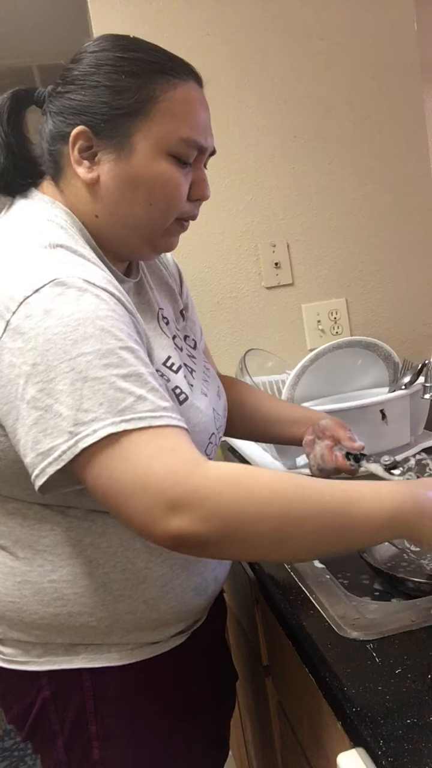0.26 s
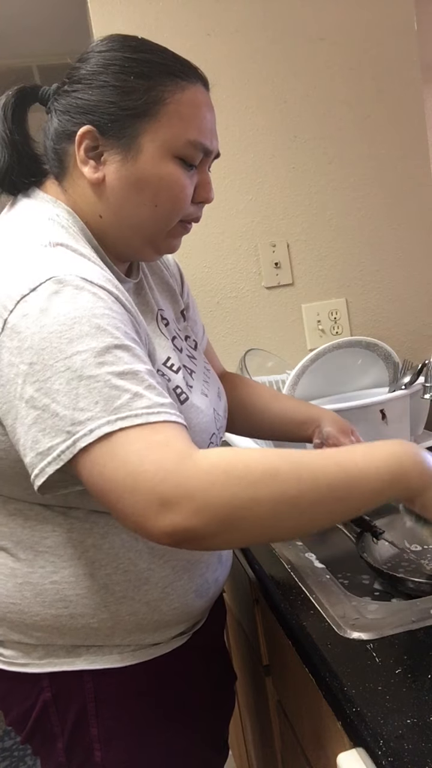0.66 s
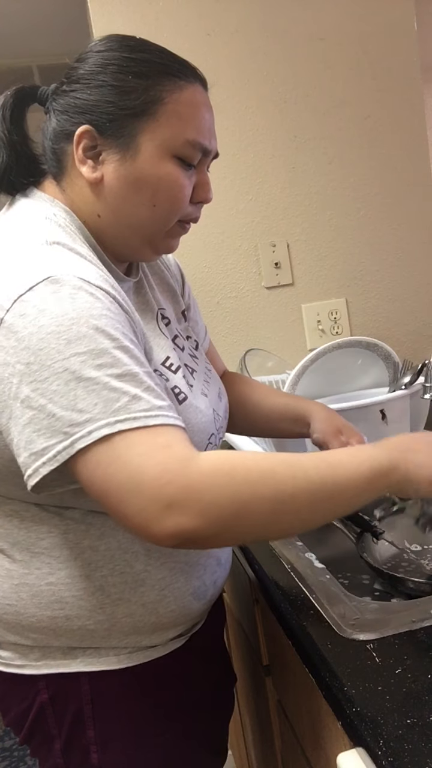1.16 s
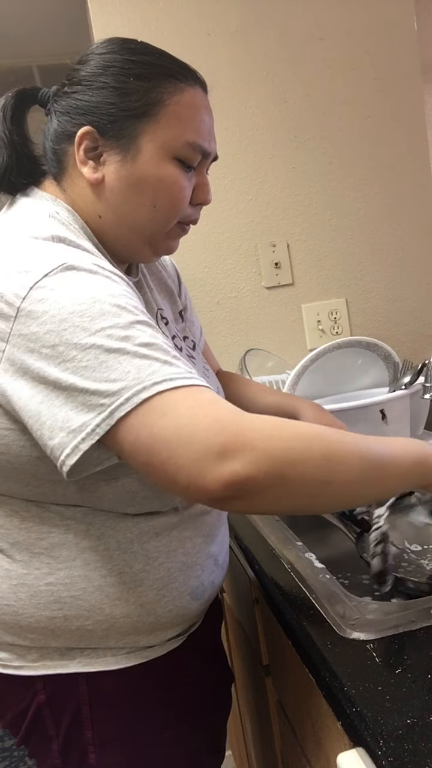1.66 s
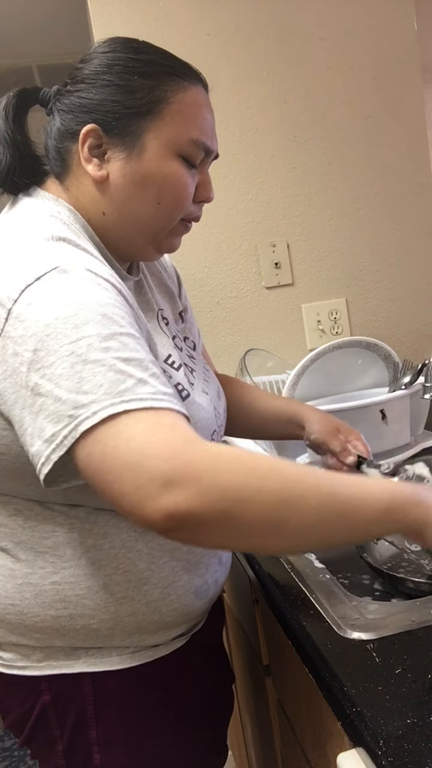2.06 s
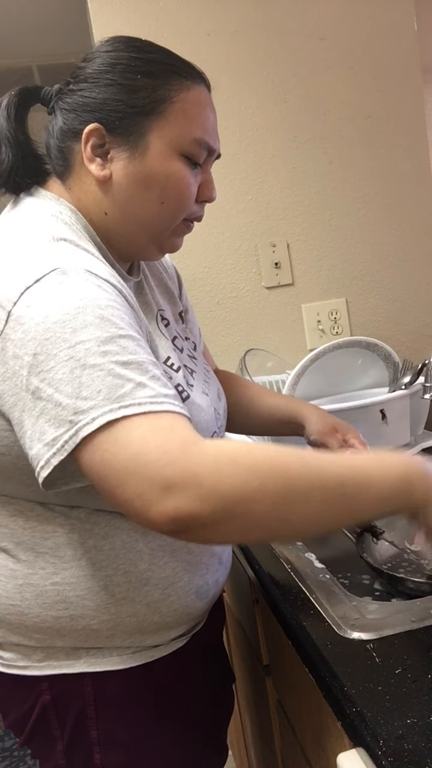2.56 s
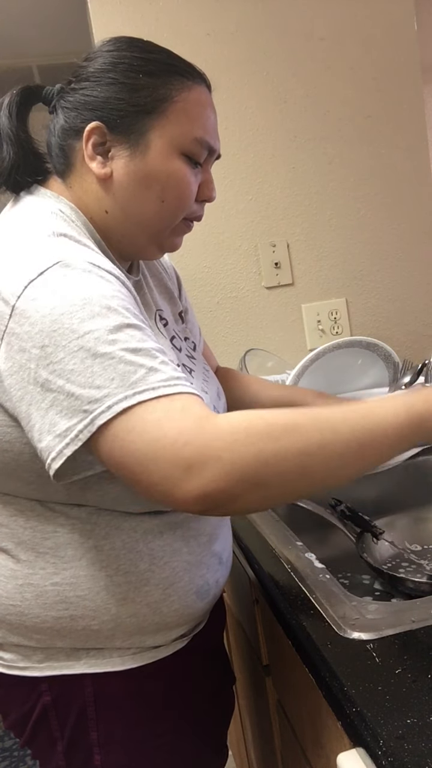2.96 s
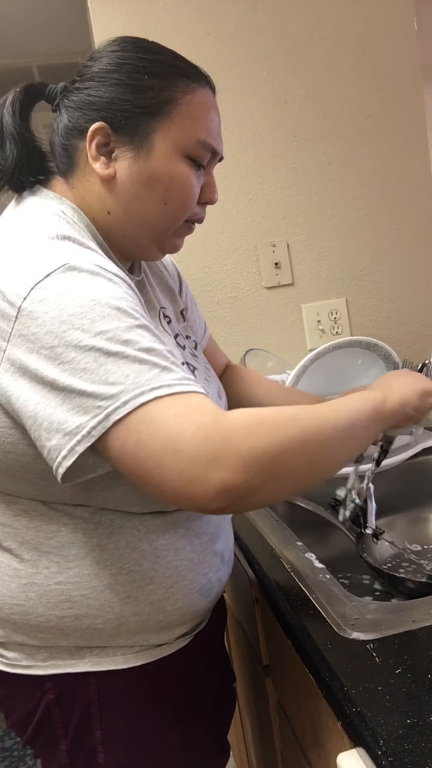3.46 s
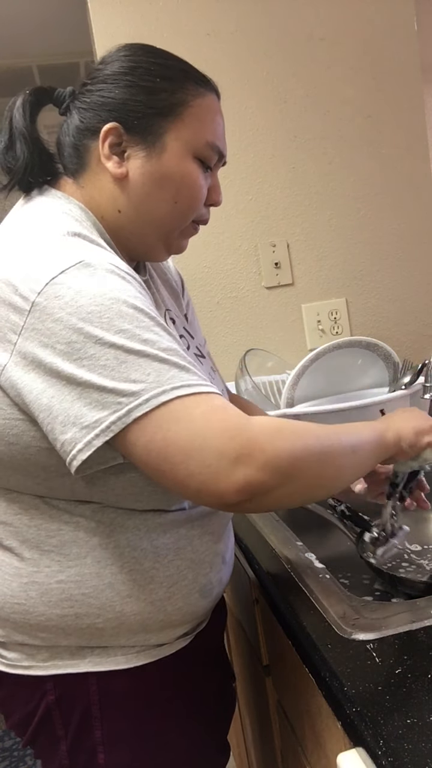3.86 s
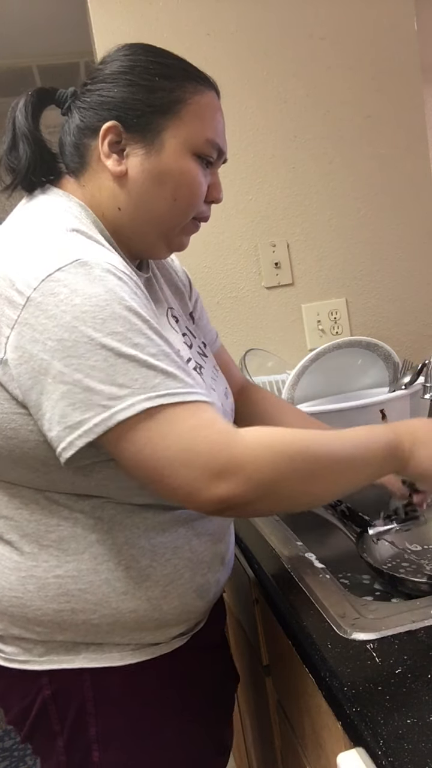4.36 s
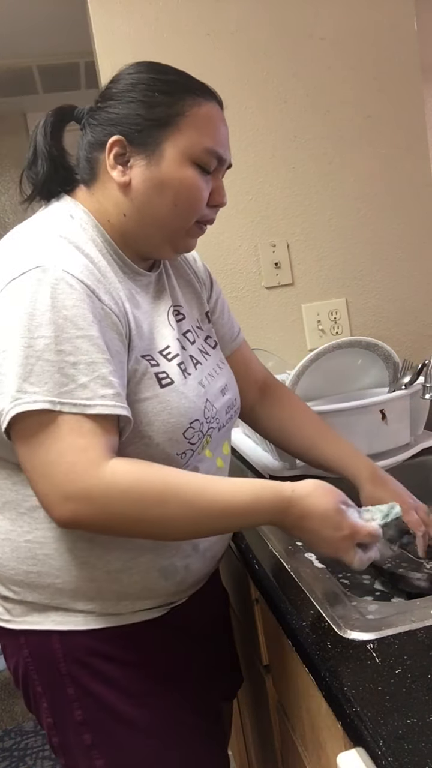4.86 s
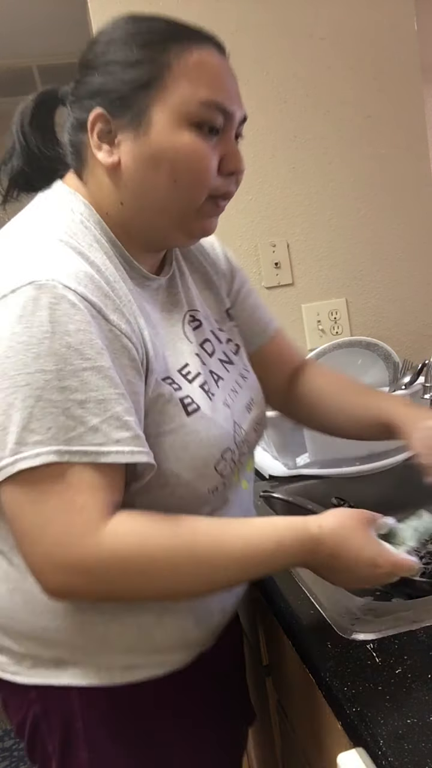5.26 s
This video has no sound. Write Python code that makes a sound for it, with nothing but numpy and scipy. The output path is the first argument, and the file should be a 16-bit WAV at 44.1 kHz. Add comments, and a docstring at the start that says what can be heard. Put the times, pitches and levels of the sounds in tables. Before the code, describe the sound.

Utensils are washed by hand at a steel sink, heard close in a small, slightly echoing kitchen with a faint, steady appliance hum. From the start until about 4.8 seconds everything is quiet: soft, wet sponge rubs swell and fade among small, irregular metal ticks and dull taps. The scrubbing is a little stronger around 1.4 to 1.7 seconds and again near 4.4. Soft, low bumps against the basin come at about 1.7 and 2.1 seconds, and a very faint squeak of wet steel at 2.7. At about 4.8 seconds the utensils land on a dish with a loud, bright clatter, followed by a second just after 5.0. Each has a short ring, a metallic rattle and a low boom from the basin. Lighter knocks fall between them and afterwards, at about 5.3 and 5.5 seconds.

```python
"""Washing up at a steel sink

Utensils are scrubbed by hand: friction makes soft wet rubs, and light impacts make small ticks.
They are then put down on a dish in the basin, which clatters loudly twice, with lighter knocks
between and after. Each knock excites the damped modes of the dish and the low boom of the basin.
The small kitchen reverberates, an appliance hums, and a limiter flattens the hardest blows."""
import sys
import numpy as np
from scipy import signal
from scipy.fft import rfft, irfft
from scipy.io import wavfile
from scipy.ndimage import uniform_filter1d, minimum_filter1d

SR = 44100
rng = np.random.default_rng(int(sys.argv[2]) if len(sys.argv) > 2 else 0)


def digitize_waveform(pressure):
    """Quantize a signal to 16-bit integers and store it at the path in sys.argv[1].

    Rows of a 2-D input are taken as channels; values are limited to [-1, 1].
    """
    field = np.atleast_2d(pressure).T
    bounded = np.clip(field, -1, 1)
    quanta = np.round(bounded * 32767).astype(np.int16)
    wavfile.write(sys.argv[1], SR, quanta)


N = 243431

# knocks on the dish: start_s, strength_db, spot (0 to 2), free_ring_s, crash_re_ring_db
KNOCK_EVENTS = [(4.8293, -5, 0, 0.029, -7.5), (4.8375, -13, 0, 0.02, -24), (4.882, -28.5, 0, 0.019, -0.5),
                (4.913, -52, 2, .024, 18), (4.982, -26, 0, 0.0038, -9.5), (5.0255, -25.5, 2, 0.0092, -13.5),
                (5.049, -25, 2.2, 0.0073, -15.5), (5.0714, -5.5, 1, 0.021, -12),
                (5.084, -18.5, 1, 0.0095, -24), (5.202, -23.5, .6, .011, -24),
                (5.2789, -18, 1.9, 0.022, -10.5), (5.4428, -50.5, 2.4, 0.036, 5),
                (5.4788, -25.5, 1.3, 0.0065, -12.5)]
# modes of the dish: pitch_hz, t60_s, spot_0_db, spot_1_db, spot_2_db
DISH_MODES = [(748, .1, -8, -21, -24), (803, .12, -7, -14, -18), (850, .15, 0, 0, 0),
              (924, .17, -4, -12, -19), (1117, .13, -16, -21, -27), (1225, .13, -15, -27, -25),
              (1394, .2, -17, -23, -27), (1467, .16, -14, -28, -25), (1520, .24, -4, -22, -14),
              (1595, .22, -7, -20, -22), (1620, .13, -16, -3, -20), (1737, .15, -23, -16, -22),
              (2410, .1, -24, -13, -19), (2630, .12, -26, -5, -18), (2740, .12, -26, -12, -22),
              (2899, .14, -20, -18, -17), (3031, .18, -11, -5, -18), (3108, .2, -13, -11, -17),
              (3742, .18, -16, -21, -22), (3836, .16, -19, -12, -20), (4174, .28, -8, -26, -25),
              (4209, .24, -12, -16, -16), (4328, .2, -15, -28, -30), (5257, .15, -20, -33, -44),
              (5732, .18, -18, -24, -38), (6820, .14, -25, -25, -34), (7076, .18, -21, -33, -33),
              (9401, .18, -24, -37, -52), (10057, .14, -39, -36, -56), (12371, .13, -27, -46, -62)]
# dense ring of utensils and sheet steel: frequency_hz, density_db
STEEL_SPECTRUM = [(60, -28), (400, -8.5), (620, -27), (800, 9), (1100, 0.5), (1600, 3), (2100, -1),
                  (3000, -1.5), (4300, 3.5), (4900, -10), (7000, -8), (10500, -15.5), (15000, -14.5),
                  (16500, -39)]
# high partials of the utensils, standing out of that ring: pitch_hz
STEEL_PARTIALS = [4640, 4900, 5390, 5740, 5739, 6090, 6880, 7180, 7840, 8590, 9540, 9950, 11260, 12200,
                  12370]
# low modes of the basin: pitch_hz, level_db, t60_s
BASIN_MODES = [(47.2, -25, .6), (67.33, -6, 0.59), (159.2, -8, 0.61), (175, -2.5, 0.56), (217, -2, 0.26),
               (237, -7, 0.69), (286.7, -0.5, 0.74), (316, -7, 0.88), (551, 2.5, 0.2)]
# boom of the basin relative to the knock: spot_0_db, spot_1_db, spot_2_db
BASIN_COUPLING = (-29, -43.5, -43.5)
# light taps of the utensils: start_s, strength_db, body_db
TAP_EVENTS = [(0.261, -49.5, -8), (0.746, -63, -12), (0.774, -51, -5.5), (0.913, -64, -5),
              (1.1657, -44.5, -11), (1.4901, -55, 2), (1.651, -43, -3.5), (2.017, -56.5, -7),
              (2.398, -56, 1), (2.453, -49.5, 8), (2.605, -54, -6), (3.07, -62, 8), (3.311, -64, 9),
              (3.6144, -44.5, -8), (4.288, -46.5, -7), (4.3761, -48.5, -30), (4.397, -44.5, -10),
              (4.449, -56, 11), (4.521, -53.5, -8), (4.786, -46.5, 8)]
# noise of a tap: frequency_hz, density_db, body_weight, treble_weight
TAP_SPECTRUM = [(350, 1, 0, 0), (900, 0, 1, 0), (1700, 5.5, 1, 0), (2800, 1, 0, 0), (4200, 6, 0, 0),
                (5200, -3, 0, 0), (6800, -2, 0, 0), (8500, -8.5, 0, 1), (15000, -16, 0, 1),
                (16500, -55, 0, 0)]
# modes of a utensil: pitch_hz, level_db, t60_s
UTENSIL_MODES = [(1450, 5, 0.1), (2560, -25, 0.055), (4270, -9, 0.04), (4470, 5, 0.073),
                 (4530, -7.5, 0.091), (7400, -29, 0.09)]
# quick rubs, dull taps and the brief ring after a tap: peak_s, length_s, level_db, centre_hz
HANDLING_EVENTS = [(0.26, 0.031, -63, 3020), (0.779, 0.011, -50, 1550), (1.502, 0.053, -59.5, 1720),
                   (1.579, .008, -46.5, 1700), (1.598, 0.018, -48, 2270), (1.654, 0.0073, -52.5, 2840),
                   (1.85, 0.019, -64.5, 3850), (2.142, 0.03, -53, 1270), (2.458, 0.0072, -51, 1150),
                   (3.409, 0.012, -59.5, 1960), (3.624, 0.024, -57, 3750), (3.799, 0.035, -54.5, 2840),
                   (3.822, 0.019, -46.5, 2360), (4.399, 0.024, -60, 2630), (4.788, 0.0077, -45, 3000),
                   (4.8, 0.064, -58, 1500), (4.825, 0.014, -36, 1400)]
# modes of the handled steel: pitch_hz, level_db
HANDLED_MODES = [(1303, -0.5), (1900, -3.5), (2620, -3.5), (3456, 4), (3898, 5), (4150, 3)]
# slow passes of the sponge: peak_s, level_db
SPONGE_PASSES = [(.38, -71), (1.02, -68.5), (1.36, -64), (1.6, -60), (1.9, -72), (2.39, -72.5), (3.42, -76),
                 (4.38, -61), (4.78, -70)]
# fizz of the sponge: frequency_hz, density_db
SPONGE_SPECTRUM = [(400, -27), (900, 1.5), (1600, 5.5), (2600, 1.5), (4200, 1.5), (5100, -3.5),
                   (6600, -7.5), (8200, -16), (15000, -26), (16500, -50)]
# soft bumps against the basin: start_s, strength_db
BUMP_EVENTS = [(1.650, -59), (2.136, -53.5)]
# reverberation of the kitchen: frequency_hz, t60_s
KITCHEN_DECAY = [(100, 0.76), (400, 0.88), (900, 0.48), (2000, 0.77), (4000, 0.59), (6000, 0.64),
                 (9000, 0.53), (15000, 0.98)]
# room noise: frequency_hz, density_db
AIR_SPECTRUM = [(18, -32), (35, -10.5), (75, -2), (100, -8), (160, -4), (310, -8.5), (570, -21),
                (800, -18.5), (1600, -25.5), (4200, -32.5), (5100, -38), (6800, -38), (8500, -44.5),
                (16000, -51)]
# tones of the appliance: pitch_hz, level_db
HUM_TONES = [(58.7, -65), (120, -77.5), (149, -66.5), (172, -68), (225, -75.5), (298, -84.5), (370, -79.5),
             (456, -79)]
# slow drift of their phases: frequency_hz, density_db
DRIFT_SPECTRUM = [(2, 0), (6, -12), (30, -100)]


def dish_knocks(first_edge_hz=15400, sink_oct_per_s=3.98, crash_t60=0.21, crack_db=14, crack_s=0.00081,
                boom_swell_s=0.012):
    """Impact excitation: dish, steel and basin ring; as the contacts soften, the treble edge sinks."""
    out, t = np.zeros(N), np.arange(SR) / SR
    for start_s, db, spot, free_s, steel_db in KNOCK_EVENTS:
        edge_hz = first_edge_hz * 2 ** (-sink_oct_per_s * (start_s - KNOCK_EVENTS[0][0]))
        ring = amp(db) * dish_ring(start_s, t, spot, free_s, edge_hz)
        crack = amp(crack_db) * edge_hz / SR * np.exp(-t / crack_s)  # hard contacts crack first
        crash = amp(db + steel_db) * steel_ring(SR, STEEL_SPECTRUM) * (amp(-60 * t / crash_t60) + crack)
        crash = signal.lfilter(*signal.butter(2, edge_hz, fs=SR), crash)
        boom_db = db + np.interp(spot, range(3), BASIN_COUPLING)
        boom = amp(boom_db) * basin_boom(start_s, t) * (1 - np.exp(-t / boom_swell_s))
        add(out, start_s, ring + crash + boom)
    return out


def dish_ring(start_s, t, spot, free_s, edge_hz, swell_s=0.0027, damped_db=-15, settle_s=0.0024):
    """Modal superposition: the struck spot weights the modes; the dish jumps, lands and is damped."""
    ring = np.zeros(len(t))
    for hz, t60, *spots_db in DISH_MODES:
        reach = 1 / np.sqrt(1 + (hz / (1.7 * edge_hz)) ** 4)  # soft contacts miss the high modes
        decay = amp(np.interp(spot, range(3), spots_db) - 60 * t / t60)
        # running phase: a quick second contact feeds the ring already there
        ring += reach * decay * np.sin(2 * np.pi * hz * (t + start_s))
    settled = .5 + .5 * np.tanh((t - free_s) / (2 * settle_s))
    return ring * amp(damped_db * settled) * (1 - np.exp(-t / swell_s))


def utensil_rattle(contact_s=0.00098, tilt_db_per_oct=1, gain_db=-11, lift_s=0.028, fall_db_per_s=420,
                   linger_db=-21, linger_t60=0.38):
    """Incoherent addition: utensils tossed by the knocks land in random contacts whose powers add."""
    t, power = np.arange(N) / SR, np.zeros(N)
    impacts = abs(grains(N, per_s=450, spread_db=0))
    contacts = signal.lfilter([1], [1, -np.exp(-1 / (contact_s * SR))], impacts)
    bright = [(hz, db + tilt_db_per_oct * np.log2(hz / 1000)) for hz, db in STEEL_SPECTRUM]
    hardest_db = max(db + steel_db for _, db, _, _, steel_db in KNOCK_EVENTS)
    for start_s, db, _, _, steel_db in KNOCK_EVENTS:
        jolt_db = hardest_db + 1.6 * (db + steel_db - hardest_db)  # weak knocks barely move them
        lift = np.clip((t - start_s) / lift_s, 0, 1) ** 2
        landed_s = np.maximum(t - start_s - lift_s, 0)
        fade = amp(-fall_db_per_s * landed_s) + amp(linger_db - 60 * landed_s / linger_t60)
        power += (amp(jolt_db) * lift * fade) ** 2
    return amp(gain_db) * np.sqrt(power) * unit(contacts * steel_ring(N, bright))


def steel_ring(count, spectrum, width_hz=45, peak_db=9, valley_db=-4, sparse_from_hz=4450):
    """Modal overlap: dense modes of steel merge into noise, thinning to partials in the treble."""
    hz = np.fft.rfftfreq(count, 1 / SR)
    peaks = sum(1 / (1 + (2 * (hz - partial) / width_hz) ** 2) for partial in STEEL_PARTIALS)
    floor = np.where(hz > sparse_from_hz, amp(valley_db), 1)
    gain = np.sqrt(floor ** 2 + amp(peak_db) ** 2 * peaks)
    return irfft(rfft(colour(rng.standard_normal(count), spectrum)) * gain, count)


def basin_boom(start_s, t):
    """Free vibration: the low modes of the basin decay exponentially."""
    return sum(amp(db - 60 * t / t60) * np.sin(2 * np.pi * hz * (t + start_s))
               for hz, db, t60 in BASIN_MODES)


def utensil_taps(gain_db=4, hard_tap_db=-43.5, snap_s=0.002, buzz_db=-19, buzz_t60=0.081, ping_db=-25):
    """Heavy damping: a hand-held utensil gives only a sharp snap, a brief buzz and a faint ping."""
    out, t = np.zeros(N), np.arange(8192) / SR
    decay = np.exp(-t / snap_s) + amp(buzz_db - 60 * t / buzz_t60)
    for start_s, db, body_db in TAP_EVENTS:
        treble_db = 2.5 * min(db - hard_tap_db, 0) - 4 * max(body_db, 0)  # weak or blunt taps are dull
        spectrum = [(hz, base_db + body * body_db + treble * treble_db)
                    for hz, base_db, body, treble in TAP_SPECTRUM]
        grip = rng.uniform(1.0, 1.02, len(UTENSIL_MODES))  # the grip detunes each mode a little
        ping = sum(amp(mode_db - 60 * t / t60) * np.sin(2 * np.pi * hz * detune * t)
                   for (hz, mode_db, t60), detune in zip(UTENSIL_MODES, grip))
        snap = colour(rng.standard_normal(len(t)), spectrum) * decay
        add(out, start_s, amp(db + gain_db) * (snap + amp(ping_db) * ping))
    return out


def handling_noise(rise_share=0.44, width_oct=0.68, firm_db=-54):
    """Resonant filtering: grainy swells make quick rubs, dull taps and the brief ring after a tap."""
    out = np.zeros(N)
    t = np.arange(32768) / SR - .3  # zero at the peak of the swell
    hz = np.geomspace(100, 17000, 300)
    for peak_s, length_s, db, centre_hz in HANDLING_EVENTS:
        rise_s, fade_s = length_s * rise_share, length_s * (1 - rise_share)
        swell = np.exp(-np.maximum(-t / rise_s, t / fade_s))
        # suds fizz more on high-pitched contacts and are squeezed out by hard ones
        fizz_db = -31 + 4 * np.log2(centre_hz / 2000) - 0.2 * (db - firm_db)
        resonance = np.exp(-.5 * (np.log2(hz / centre_hz) / width_oct) ** 2)
        spectrum = np.c_[hz, 20 * np.log10(resonance + amp(fizz_db))]
        burst = amp(db) * swell * colour(grains(len(t), per_s=12000, spread_db=4.5), spectrum)
        add(out, max(peak_s + t[0], 0), burst[peak_s + t >= 0])
    return out


def handled_steel(drive, ring_db=3, t60=0.16):
    """Forced vibration: handling drives the modes of the steel, whose ring is added to the drive."""
    t = np.arange(SR // 2) / SR
    fade = amp(-60 * t / t60)
    modes = sum(amp(db) * np.cos(2 * np.pi * hz * t) for hz, db in HANDLED_MODES)
    response = 2 * fade / fade.sum() * modes
    return drive + amp(ring_db) * signal.fftconvolve(drive, response)[:N]


def sponge_fizz(build_db_per_s=43.5, release_db_per_s=110):
    """Amplitude modulation: the fizz follows hand pressure, which builds slowly and lets go quickly."""
    t = np.arange(N) / SR
    passes_db = [db - np.maximum((peak_s - t) * build_db_per_s, (t - peak_s) * release_db_per_s)
                 for peak_s, db in SPONGE_PASSES]
    return amp(np.max(passes_db, axis=0)) * colour(grains(N, per_s=3500, spread_db=2), SPONGE_SPECTRUM)


def finger_squeak(peak_s=2.735, sigma_s=0.067, level_db=-73, centre_hz=2060, half_width_hz=100):
    """Stick-slip friction: wet steel squeaks once under the fingers, in a narrow band of noise."""
    t, hz = np.arange(N) / SR, np.fft.rfftfreq(N, 1 / SR)
    resonance = 1 / (1 + ((hz - centre_hz) / half_width_hz) ** 2)
    slips = irfft(rfft(rng.standard_normal(N)) * resonance, N)
    return amp(level_db) * np.exp(-.5 * ((t - peak_s) / sigma_s) ** 2) * unit(slips)


def basin_bumps(cutoff_hz=110, gain_db=10):
    """Long contact acts as a low-pass filter: a soft push stirs only the basin's lowest modes."""
    out, t = np.zeros(N), np.arange(SR) / SR
    for start_s, db in BUMP_EVENTS:
        add(out, start_s, amp(db + gain_db) * basin_boom(start_s, t))
    return signal.lfilter(*signal.butter(2, cutoff_hz, fs=SR), out)


def kitchen_reverb(source, early_db, early_s=0.012, gap_s=0.007):
    """Reverberation: reflections, strongest from the near basin and wall, decay band by band."""
    reflections = rng.choice([-1., 1.], SR) * (rng.random(SR) < .1)
    hz, frame_s, bands = signal.stft(reflections, SR, nperseg=256)
    decay = amp(-60 * frame_s / read(KITCHEN_DECAY, hz)[:, None])
    tail = signal.istft(bands * decay, SR, nperseg=256)[1]
    t = np.arange(len(tail)) / SR
    tail *= (t > gap_s) * (1 + amp(early_db) * np.exp(-t / early_s))
    return signal.fftconvolve(source, tail / np.linalg.norm(tail))[:N]


def hum_and_air(air_db=-61, waver_rad=0.36):
    """Phase modulation: the tones of an appliance waver slightly over steady room noise."""
    t = np.arange(N) / SR
    out = amp(air_db) * colour(rng.standard_normal(N), AIR_SPECTRUM)
    for hz, db in HUM_TONES:
        drift = colour(rng.standard_normal(N), DRIFT_SPECTRUM)
        out += amp(db) * np.sqrt(2) * np.sin(2 * np.pi * (hz * t + rng.random()) + waver_rad * drift)
    return out


def grains(count, per_s, spread_db):
    """Shot noise: tiny slips, contacts or bursting suds as random clicks of unequal size."""
    size = amp(spread_db * np.minimum(rng.exponential(1, count), 4))
    return size * rng.standard_normal(count) * (rng.random(count) < per_s / SR)


def colour(x, spectrum):
    """Spectral shaping: filters x and scales it to rms 1."""
    gain = amp(read(spectrum, np.fft.rfftfreq(len(x), 1 / SR)))
    return unit(irfft(rfft(x) * gain, len(x)))


def read(points, hz):
    """Interpolation on a log-frequency axis."""
    points_hz, values = np.transpose(points)
    return np.interp(np.log(hz + 1), np.log(points_hz), values)


def amp(db):
    """Decibels to amplitude ratio."""
    return 10 ** (np.asarray(db) / 20)


def unit(x):
    """Normalisation to rms 1."""
    return x / np.sqrt(np.mean(x ** 2) + 1e-20)


def add(mix, start_s, sound):
    """Superposition of a sound on the mix from start_s."""
    part = mix[round(start_s * SR):][:len(sound)]
    part += sound[:len(part)]


def scene(clatter_room_db=-11, hand_room_db=-3):
    """Direct and reverberant fields add: clatter and handwork share the kitchen."""
    clatter = dish_knocks() + utensil_rattle()
    hands = utensil_taps() + handled_steel(handling_noise()) + sponge_fizz() + finger_squeak()
    room = amp(clatter_room_db) * kitchen_reverb(clatter, early_db=-17)
    room += amp(hand_room_db) * kitchen_reverb(hands, early_db=16.5)
    return (clatter + hands + basin_bumps() + room + hum_and_air())[None]


def record(dry, ceiling_db=-2, recovery_db_per_s=260, cutoff_hz=15900):
    """Peak limiting: the gain drops at each overshoot and recovers; a low-pass limits the band."""
    over_db = np.maximum(20 * np.log10(abs(dry[0]) + 1e-9) - ceiling_db, 0)
    recovery_db = np.arange(N) * recovery_db_per_s / SR
    cut_db = np.maximum.accumulate(over_db + recovery_db) - recovery_db
    gain = uniform_filter1d(minimum_filter1d(amp(-cut_db), size=61), size=61)  # smooth look-ahead
    low_pass = signal.firwin(401, cutoff_hz, window=("kaiser", 9), fs=SR)
    return signal.oaconvolve(dry * gain, low_pass[None], "same")


dry = scene()
out = record(dry)
digitize_waveform(out)
```